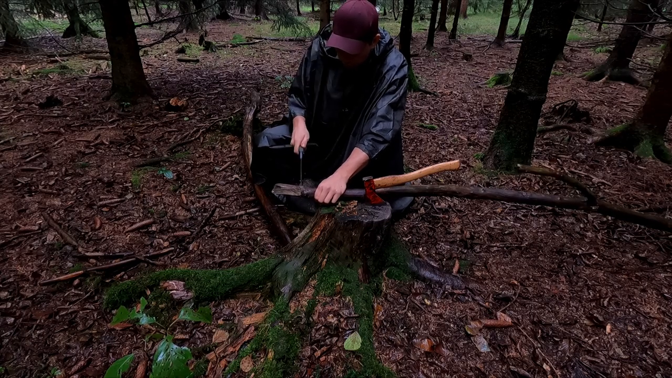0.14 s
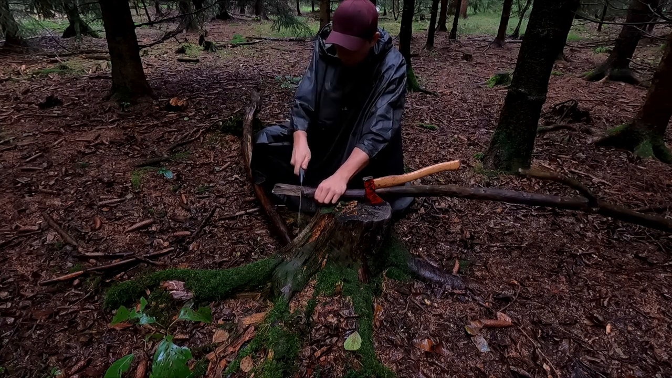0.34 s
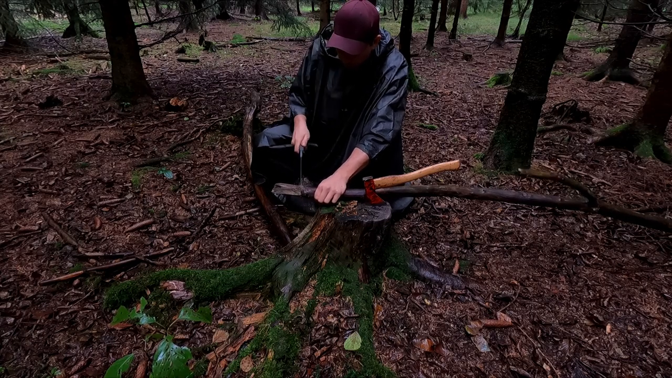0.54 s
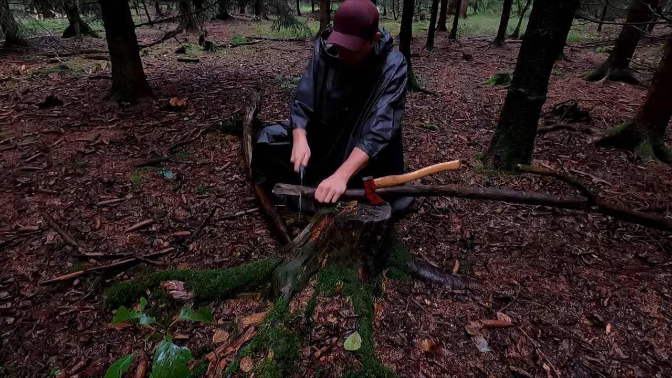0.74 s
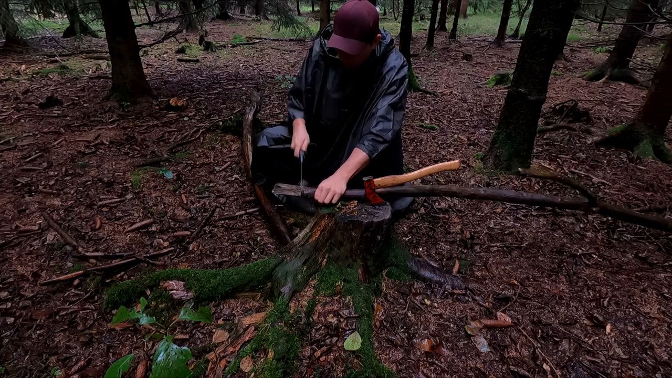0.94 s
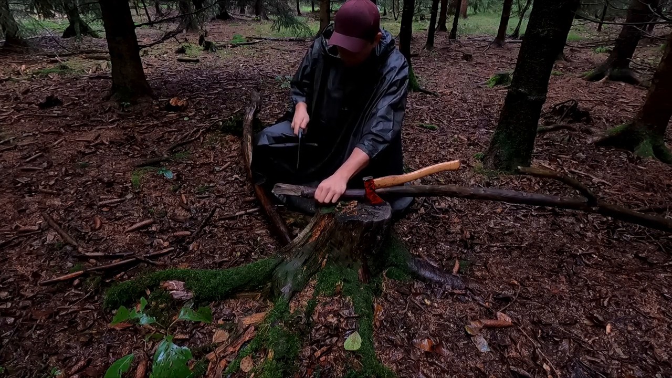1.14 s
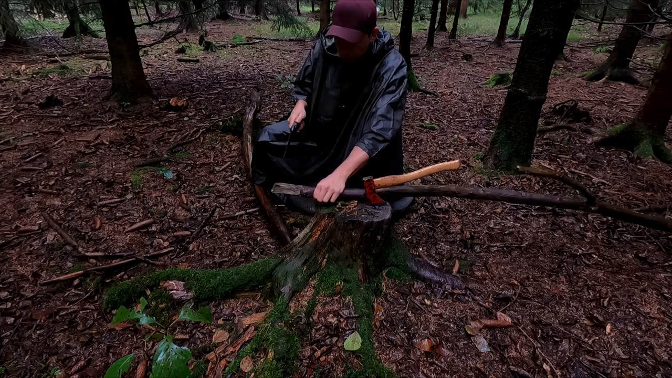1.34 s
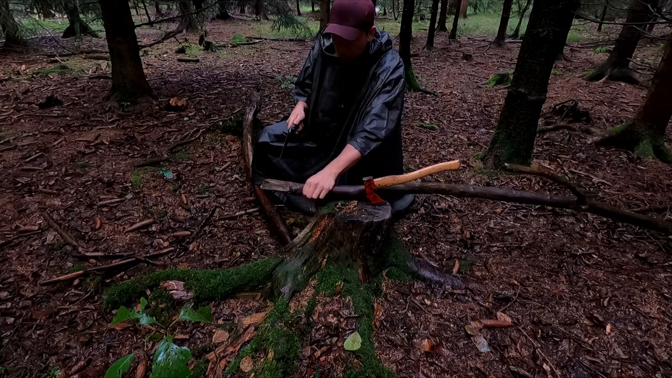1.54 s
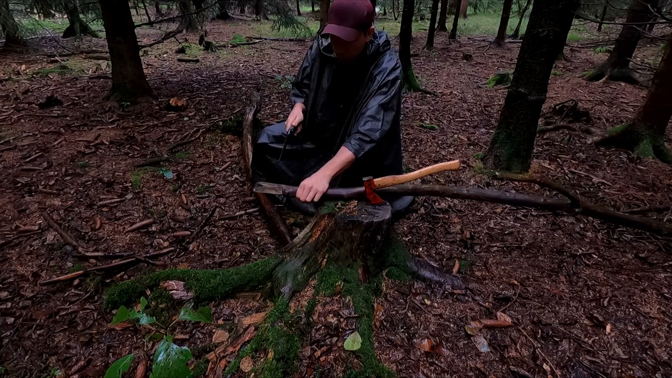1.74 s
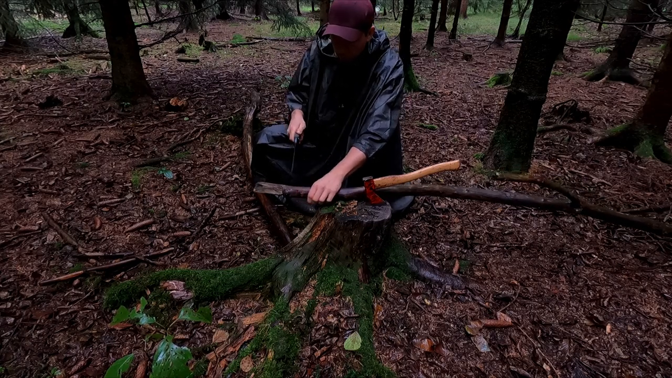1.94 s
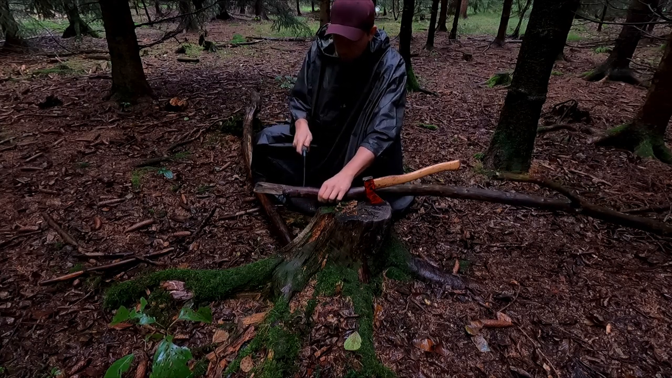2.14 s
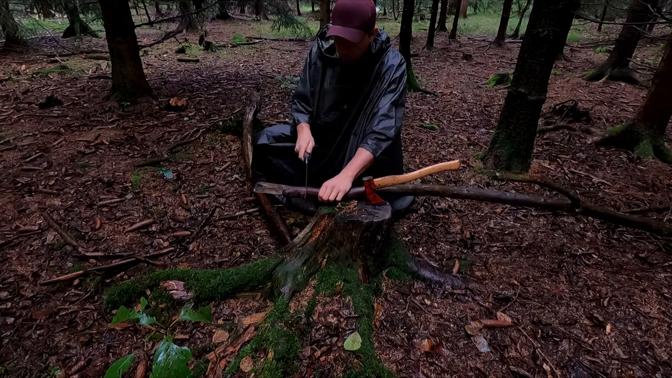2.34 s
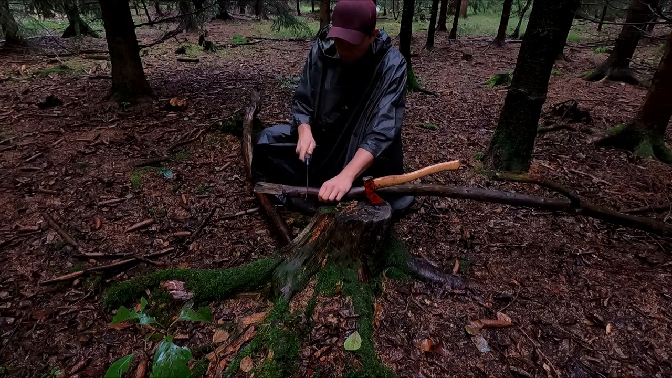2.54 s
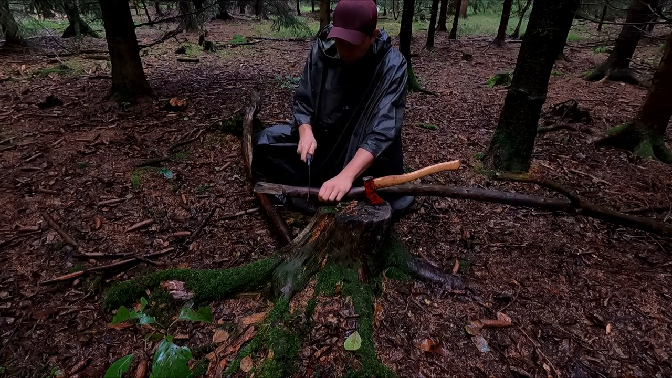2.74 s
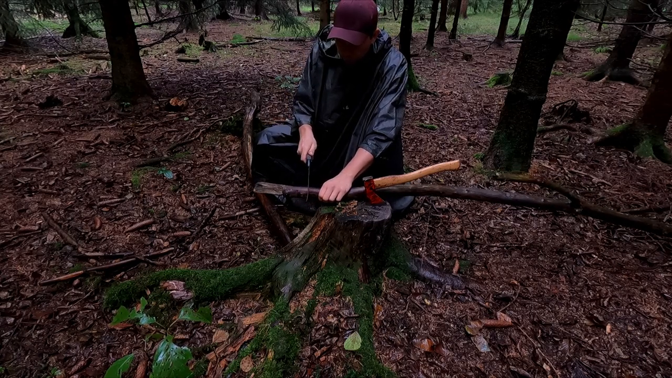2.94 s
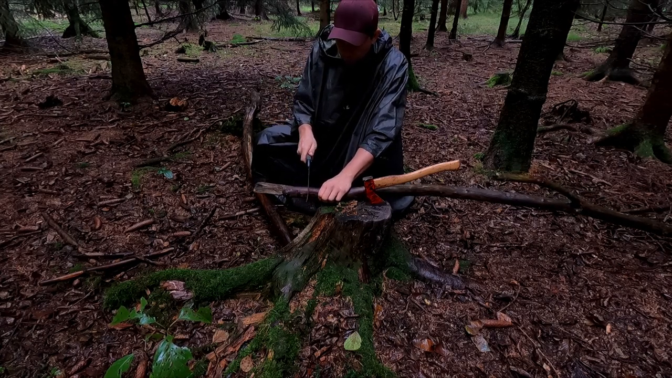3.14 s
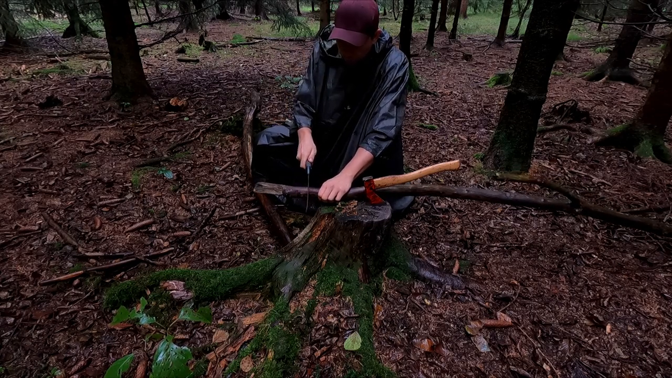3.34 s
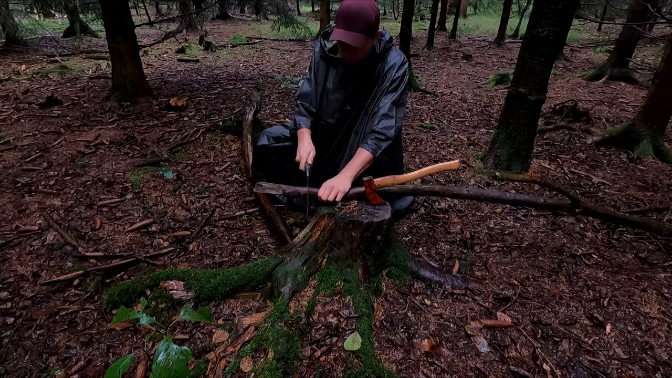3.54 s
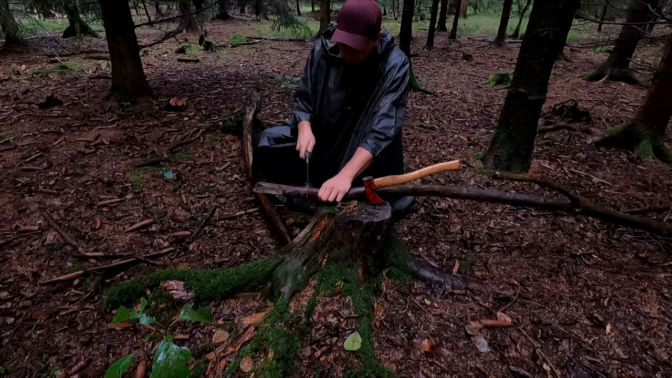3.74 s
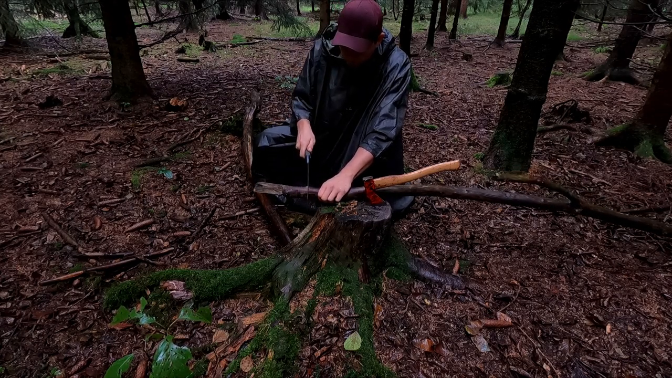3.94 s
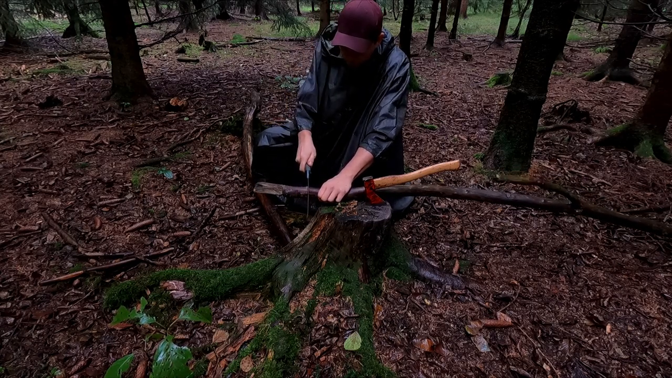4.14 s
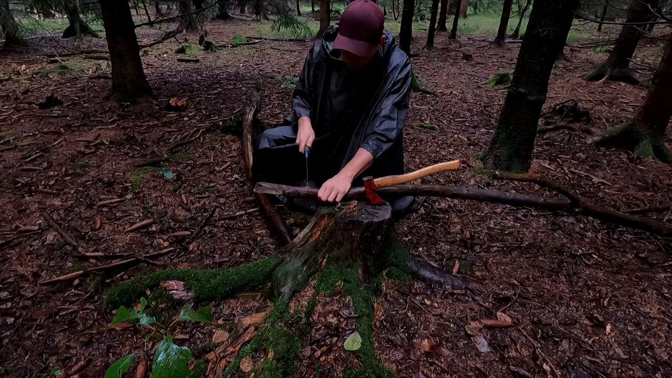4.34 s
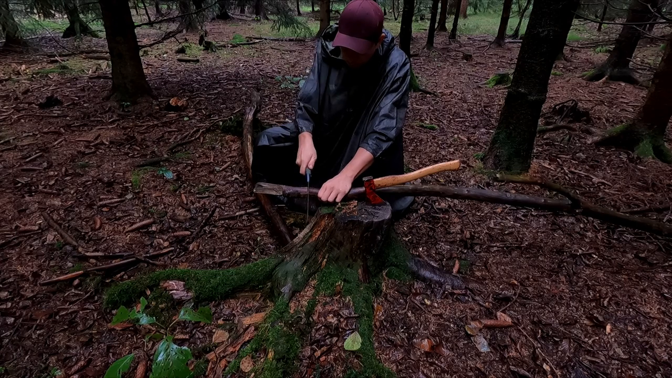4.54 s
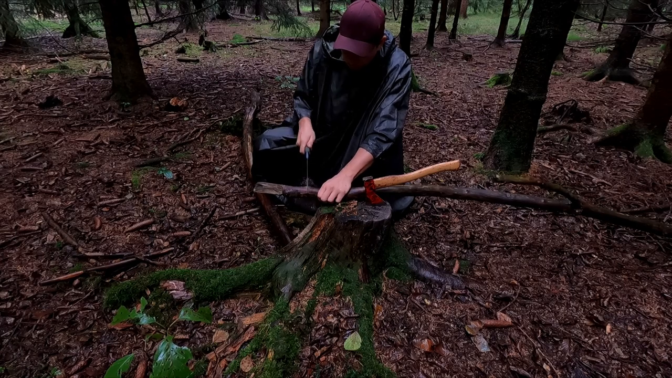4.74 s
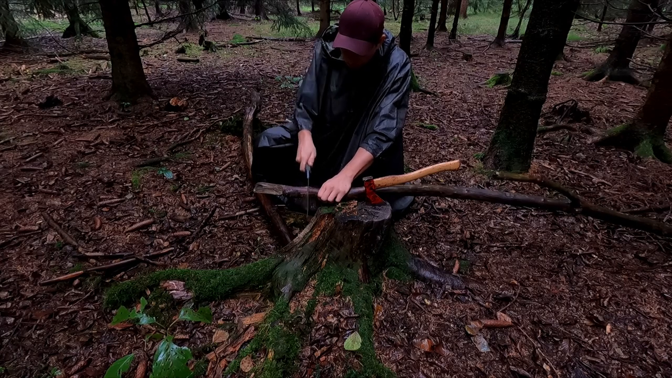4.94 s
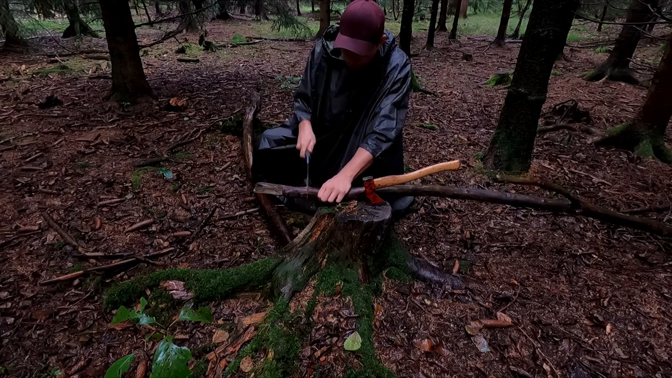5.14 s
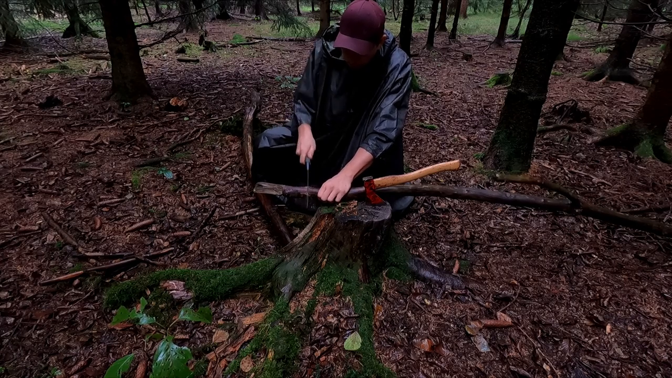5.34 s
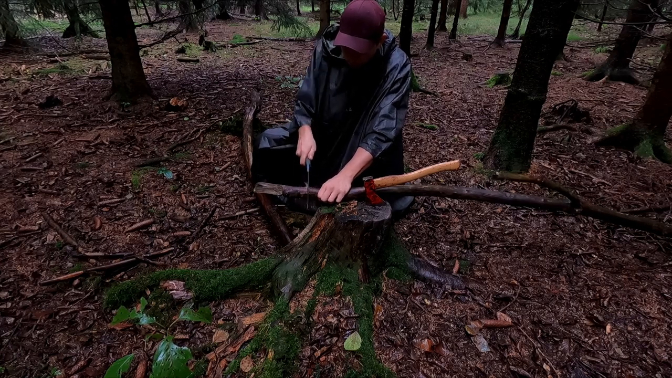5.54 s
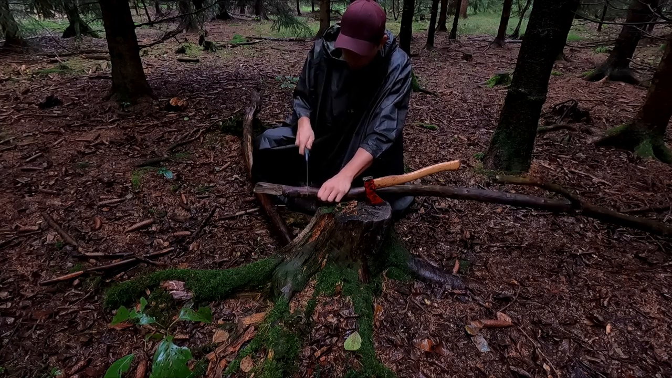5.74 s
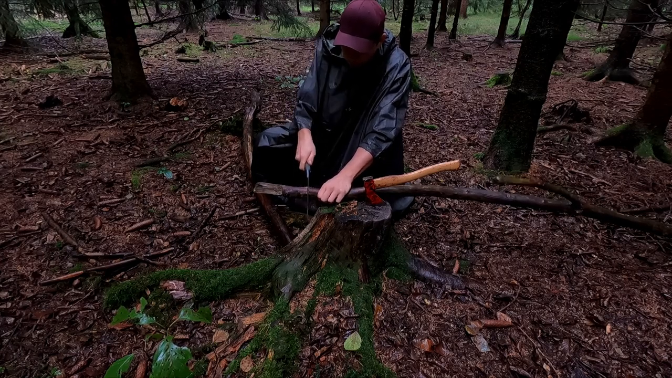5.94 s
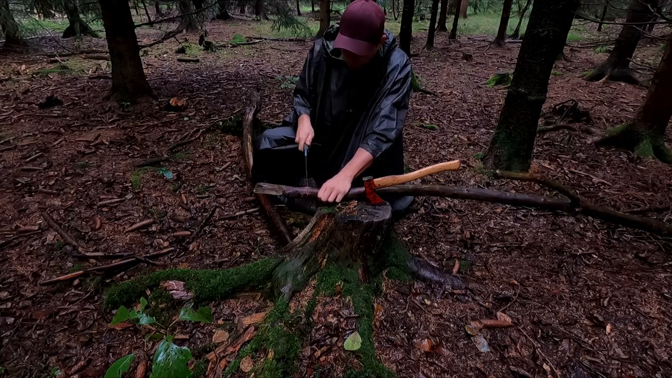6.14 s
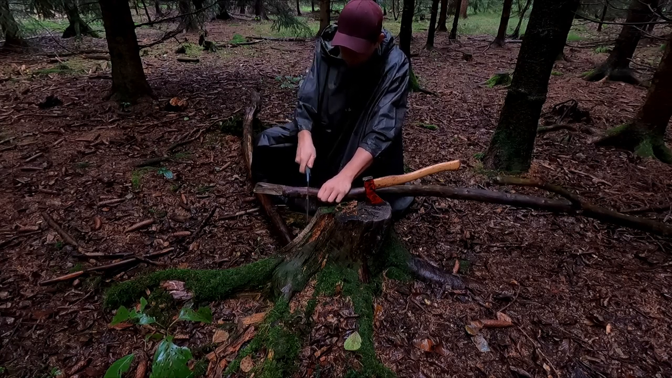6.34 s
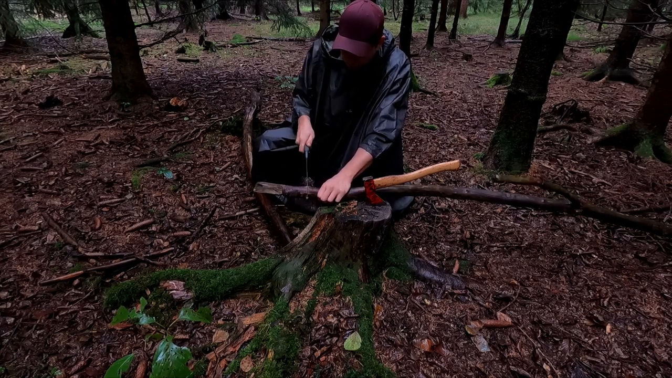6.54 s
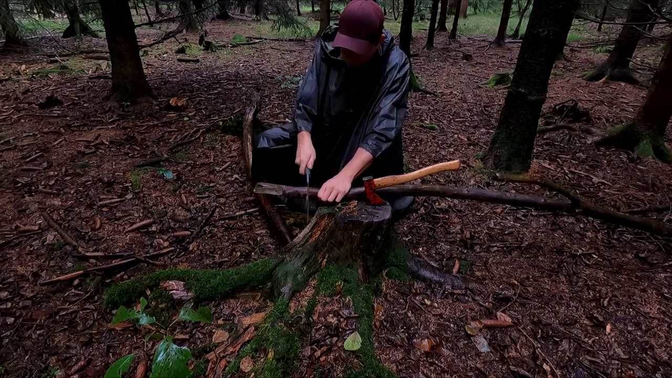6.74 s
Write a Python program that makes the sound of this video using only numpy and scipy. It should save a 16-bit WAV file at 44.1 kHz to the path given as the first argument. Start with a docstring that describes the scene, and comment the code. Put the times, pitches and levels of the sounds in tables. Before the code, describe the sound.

Two bouts of brisk, gritty hand sawing on wood, split by a quiet gap with drips, light rain, cloth crinkle and one dry snap.

```python
"""Hand saw in a wet forest

A small hand saw cuts a branch held on a stump, in two bouts of quick strokes. Teeth tear fibres at a rate that
follows the hand: random grains ring through filters for branch and blade, coloured differently at each cut.
Fading low tones make thumps and swells of the branch, short high ones a snap. Cloth crinkles in the pause,
drips tick, and filtered noise makes light rain and a low murmur of air."""
import sys
import numpy as np
from scipy import signal
from scipy.fft import rfft, irfft, next_fast_len
from scipy.io import wavfile
from scipy.ndimage import uniform_filter1d, map_coordinates

SR = 44100
rng = np.random.default_rng(int(sys.argv[2]) if len(sys.argv) > 2 else 0)


def dump_mix(stems):
    """Bounce the given channels to the path in sys.argv[1] as a 16-bit WAV at rate SR."""
    frames = np.atleast_2d(stems).T  # one column per channel
    limited = np.clip(frames, -1, 1)  # hard clip at full scale
    pcm = np.round(limited * 32767).astype(np.int16)
    wavfile.write(sys.argv[1], SR, pcm)


N = 304290
TIME = np.arange(N) / SR  # seconds

# Levels in the tables are relative; the functions shape them further.
# strokes of the blade, return and cut in turn: (start [s], end [s], hardest press [share of the stroke],
# rasp of the wood [dB], hiss of the steel [dB], depth of the bite [dB], shake of the branch [dB],
# tooth rate at full speed [Hz], tooth hum [dB])
STROKES = [(-.25, .044, 0.77, -22, -32.5, 9, -22, 226, -36),
           (.044, .263, 0.48, -19, -35.5, 2, -35.5, 305, -23.5),
           (.263, .488, 0.74, -24.5, -38.5, -1.5, -33.5, 262, -32),
           (.492, .722, .42, -18.5, -33, 2.5, -43, 325, -31),
           (.722, .942, .67, -25, -38, 2.5, -40, 262, -34.5),
           (.942, 1.199, 0.36, -18.5, -33, 1.5, -35.5, 312, -21.5),
           (3.28, 3.63, 0.48, -33.5, -45.5, -2, -27, 80.04, -29.5),
           (3.688, 4.01, 0.51, -25, -38, 5.5, -27.5, 251, -31.5),
           (4.005, 4.246, 0.66, -23.5, -37.5, 0.5, -36, 122.2, -27),
           (4.246, 4.482, 0.57, -19, -33.5, 2, -29, 233.5, -28),
           (4.482, 4.702, 0.61, -21, -33, -1, -31, 235, -32),
           (4.702, 4.925, .53, -17.5, -32, 3.5, -28, 285, -25),
           (4.925, 5.15, 0.65, -22, -32.5, 0.5, -34, 233.4, -31.5),
           (5.15, 5.373, 0.58, -17.5, -30.5, 4, -31, 297, -26),
           (5.373, 5.597, 0.62, -21, -32.5, -1, -34, 238.6, -33),
           (5.597, 5.829, 0.43, -18, -32, 3.5, -33.5, 296.5, -24),
           (5.829, 6.039, 0.62, -20.5, -32.5, 2.5, -34, 240.6, -32),
           (6.039, 6.262, 0.51, -19, -32, 2.5, -37.5, 320, -28.5),
           (6.262, 6.493, 0.61, -22, -33.5, -1.5, -33, 232.7, -34),
           (6.493, 6.714, 0.55, -19, -33, 2, -37, 290, -31.5),
           (6.714, 6.921, 0.62, -21.5, -33, -2, -30.5, 239, -30.5)]
# after each turn the teeth skate for a moment, then grip: (time since the turn [s], level [dB])
GRIP = [(0.02, -1), (0.028, 0)]
# the branch shakes most when about 130 teeth pass a second, least when they crawl:
# (tooth rate [Hz], shake [dB])
SHAKE_BY_RATE = [(10, -14.5), (66, -3.5), (130, -1), (240, -6), (320, -3)]
# broad colour of each cut: (frequency [Hz], level [dB])
FIRST_COLOUR = [(60, -27.5), (170, -10), (350, -8), (700, -6.5), (1500, -22.5), (2200, -10.5),
                (3200, -15.5), (4800, -16.5), (6500, -19.5), (9000, -21.5), (10500, -24), (12500, -37),
                (15000, -45)]
SECOND_COLOUR = [(60, -45), (170, -17.5), (350, -16), (700, -13.5), (1500, -18.5), (2200, -19), (3200, -21),
                 (4800, -25.5), (6500, -26), (9000, -24), (10500, -31.5), (12500, -39.5), (15000, -53)]
# resonances of branch and blade at each cut: (frequency [Hz], width [Hz], lift [dB])
FIRST_RESONANCES = [(826, 26, 8), (935, 39, 11.5), (1050, 71, 7), (1154, 103, 12), (1382, 153, 17.5),
                    (1505, 45, 16), (1689, 113, 15), (1840, 250, 10), (2513, 93, 10), (2895, 220, 8),
                    (3350, 77, 9.5), (7200, 610, 3)]
SECOND_RESONANCES = [(408.4, 19, 7.2), (532, 39, 14.4), (687, 76, 10.6), (742, 38, 8.7),
                     (914.3, 26.6, 11.7), (1050, 88, 11.5), (1297, 32, 9.7), (1455, 91, 5.6),
                     (1652, 33, 10.7), (1881, 280, 9.7), (2420, 13, 15.5), (2666, 110, 8.4),
                     (2890, 120, 7.7), (3272, 107, 9.7), (3790, 750, 5.2), (7610, 110, 4.5)]
# slow sway of the branch on the stump, and its second bending mode: (frequency [Hz], level [dB])
SWAY_COLOUR = [(20, -36), (45, -13.5), (66, 1.5), (88, -3.5), (115, -9), (160, -18), (300, -37),
               (800, -120)]
FLEX_COLOUR = [(70, -38), (110, -1), (145, -2), (172, 8), (205, -10.5), (250, -7), (330, -9), (900, -120)]
# how well the branch radiates the tooth rate: (frequency [Hz], level [dB])
HUM_COLOUR = [(35, -27), (65, 0.5), (120, 0), (170, 0), (220, -11.5), (265, -2.5), (300, 1), (345, -1.5),
              (700, -32)]
# likeness of left and right for saw and sleeve: (frequency [Hz], likeness [0-1])
WORK_ALIKE = [(170, 1), (860, 0.98), (1900, 0.94), (2900, 0.93), (4100, 0.78), (6200, 0.84), (8300, 1),
              (11000, 0.88), (14000, 0.31)]
# place of the work between the ears: (frequency [Hz], left over right [dB])
WORK_BALANCE = [(60, 1.5), (100, -2), (180, 0), (310, -1), (550, -2.5), (950, -3.5), (1650, -2.5),
                (2860, -1.0), (4970, -1), (8640, 1), (15000, 3)]
# how far the left side runs ahead: (frequency [Hz], lead [rad])
WORK_LEAD = [(170, -0.02), (500, -0.074), (860, -0.092), (1400, -0.13), (1900, -0.34), (2400, -0.6),
             (2900, -0.56), (3400, -0.61), (4100, -0.26), (5000, -0.31), (6200, -0.49), (8300, -0.5),
             (11000, -0.47), (14000, -0.01)]
# low thumps of the branch, and low tones swelling where the tooth rate meets a mode of the branch:
# (time [s], level [dB], pitch [Hz], time to fade by 60 dB [s])
BRANCH_TONES = [(0.532, -13.5, 195, 0.073), (0.545, -13, 221, 0.065), (1.857, -16, 88.6, 0.14),
                (1.905, -30.5, 65.1, 0.45), (1.962, -31, 64.5, 0.33), (2.015, -15, 184, 0.016),
                (3.858, -15.5, 70, 0.4), (4.166, -20.5, 113.5, 0.32), (4.553, -18, 165, 0.099),
                (4.636, -15.5, 122, 0.13), (4.754, -14.5, 171, 0.13), (5.084, -18, 122, 0.18),
                (5.646, -19.5, 164, 0.13), (5.991, -20.5, 114.7, 0.13)]
# one sharp snap close by: (time [s], level [dB])
SNAP = [(3.178, -11)]
# the tones within the snap: (frequency [Hz], level [dB], time to fade by 60 dB [s])
SNAP_TONES = [(1150, -45, 0.0045), (3050, -16, 0.02), (3210, -4, 0.017), (3500, -9, 0.012),
              (6300, -0.5, .004), (7400, 0.5, 0.0033), (9720, -3, 0.0037)]
# the sleeve rustles as the hand shifts the branch: (time [s], level [dB])
SLEEVE = [(1.5, -85), (1.6, -53), (1.69, -45), (1.76, -49.5), (1.8, -54), (1.87, -45.5), (1.95, -81),
          (2.05, -90)]
# colour of the rustling cloth: (frequency [Hz], level [dB])
SLEEVE_COLOUR = [(200, -11), (600, -15), (1500, -2), (2500, -15), (5000, -8.5), (10000, -23), (15000, -36)]
# the loudest ticks, from drops on cloth and litter and catches of the blade:
# (time [s], level [dB], pitch [Hz], ring [cycles])
TICKS = [(0.4485, -9, 1750, 1.2), (0.698, -17.5, 2620, 1.1), (1.1711, -14.5, 1560, 1.3),
         (1.4364, -28, 6420, 2.8), (1.712, -26, 5120, 3.1), (1.8494, -21, 1550, 0.5),
         (1.9538, -27, 5130, 1), (2.4602, -29, 5250, 1.6), (1.7514, -23.5, 1900, 0.85),
         (1.798, -26, 2140, 2.5), (2.014, -26.5, 2600, 2.75), (2.1963, -26, 5400, 3),
         (2.3248, -24.5, 6440, 2.3), (2.7375, -19, 1960, 1.5), (2.821, -25.5, 4000, 1.6),
         (2.8298, -28, 6700, 1.7), (2.9589, -27.5, 1770, 2.4), (3.0873, -19, 3400, 2.2),
         (3.1649, -18.5, 5200, 2.3), (3.5864, -24, 1300, 3.3), (3.6601, -23.5, 1340, 3.4),
         (3.3302, -27, 5650, 2), (3.4835, -16, 2800, 4), (3.8674, -8.5, 1630, 0.5),
         (4.2126, -16, 1500, 2.2)]
# rain on the forest: (time [s], level [dB])
RAIN = [(1.25, -50), (1.48, -50), (1.68, -48.5), (3.05, -49), (3.25, -48.5)]
# colour of the rain: (frequency [Hz], level [dB])
RAIN_COLOUR = [(240, -23), (400, -4.5), (623, -3), (784, -5), (986, 2.5), (1170, 3.5), (2020, 0.5),
               (2880, 0), (3350, -1.5), (3620, -3), (5550, -4.5), (7420, -8.5), (12500, -20), (15500, -39)]
# likeness of left and right for rain and air: (frequency [Hz], likeness [0-1])
RAIN_ALIKE = [(60, 0.59), (150, 0.76), (380, 0.23), (950, 0.8), (2380, 0.43), (5980, 0.69), (15000, 0.22)]
# low murmur of the open air: (frequency [Hz], level [dB])
AIR_COLOUR = [(12, -43), (20, -11), (59, -7), (118, -18), (135, -3.5), (160, 0.5), (201, -4), (231, -6),
              (259, -12.5), (409, -14), (600, -28), (780, -57), (1320, -120)]
# answer of the trunks: (frequency [Hz], time to fade by 60 dB [s])
FOREST = [(200, 0.59), (1500, 0.12), (10000, 0.05)]

TURN_PRESS = 0.025  # share of the press that stays while the hand turns
UNEVEN_DB = 0.27  # the press falters in knotty wood
SHAKE_LAG_S = 0.031
# rasp and hum grow as powers of the press; the hiss of the steel follows press and speed
RASP_POWER, HUM_POWER, HISS_POWER, HISS_SPEED_POWER = 1.85, 2.15, 1, 0.6
# fainter drips fall at random
DRIPS_PER_S, DRIP_DB, DRIP_SCATTER_DB = 8, -33.5, 2.5
DRIP_HZ, DRIP_SCATTER_OCTAVES, DRIP_CYCLES = 5460, 0.15, 2.3
AIR_DB = -52.5
TOP_HZ = 15600


def amp(db):
    """Turn decibels into a plain factor."""
    return 10 ** (np.asarray(db) / 20)


def unit(x):
    """Scale a sound to an average strength (rms) of 1."""
    return x / np.sqrt(np.mean(x ** 2) + 1e-20)


def along(points, hz):
    """Read a table of (frequency [Hz], value) on a log axis."""
    f, v = np.transpose(points)
    return np.interp(np.log(hz + 1), np.log(f + 1), v)


def curves(rows):
    """One value per sample for each column after the time."""
    s, *cols = np.transpose(rows)
    return [np.interp(TIME, s, c) for c in cols]


def wobble(rate):
    """A smooth random curve with this many random points a second."""
    return map_coordinates(rng.standard_normal(int(N * rate / SR) + 4), [TIME * rate])


def delayed(pair, delay_s):
    """Both sides, shifted in time by an amount that may change."""
    return np.array([np.interp(TIME - delay_s, TIME, side) for side in pair])


def filtered(x, response):
    """Shape a sound's spectrum by a response that depends on frequency."""
    size = 2 * next_fast_len((N + SR) // 2)
    return irfft(rfft(x, size) * response(np.fft.rfftfreq(size, 1 / SR)), size)[..., :N]


def causal(db):
    """The response with these gains that rings only after its cause."""
    cepstrum = irfft(np.log(amp(db)))
    half = len(cepstrum) // 2
    return np.exp(rfft(np.r_[cepstrum[0], 2 * cepstrum[1:half], np.zeros(half)]))


def band(hz, low_hz, high_hz, order=8):
    """Gain in dB of a pass band, steeper with a higher order."""
    return -10 * np.log10((1 + (hz / high_hz) ** order) * (1 + (low_hz / (hz + 1)) ** order))


def add(track, s, sound):
    """Mix a sound in at time s."""
    part = track[..., round(s * SR):][..., :sound.shape[-1]]
    part += sound[..., :part.shape[-1]]


def spread(pair, alike):
    """Two unrelated signals become left and right with the given likeness."""
    turn = lambda hz: np.arccos(np.clip(along(alike, hz), -1, 1)) / 2
    mid, side = filtered(pair, lambda hz: np.array([np.cos(turn(hz)), np.sin(turn(hz))]))
    return np.array([mid + side, mid - side])


def grains(rate, scatter_db):
    """Two trains of random impulses, about this many a second, with an rms of 1."""
    hit = rng.random((2, N)) < rate / SR
    size = amp(scatter_db * rng.standard_normal((2, N)))
    return unit(hit * rng.standard_normal((2, N)) * size)


def saw(bite=0.12, steel_bite=0.14, hiss_lift_db=2.0, flex_db=-25.5, flex_growth=0.44,
        overtone_db=-9, near_s=0.001045, far_s=0.00197, reflection=0.028):
    """Each tooth tears a burst of fibres and nudges the branch, which shakes on the stump."""
    first = TIME < 2  # seconds; the second cut follows
    teeth, rasp, hiss, shake, hum, depth_db, travel = hand()
    hiss = hiss * amp(hiss_lift_db)
    phase = 2 * np.pi * teeth
    clumps = amp(0.92 * wobble(70))
    tearing = grains(rate=9000, scatter_db=1.5) * (1 + bite * np.cos(phase)) * clumps
    sliding = grains(rate=26000, scatter_db=3.0) * (1 + steel_bite * np.cos(phase)) * clumps
    sliding = sliding * amp(1.26 * wobble(50))

    # waves return from the blade's tip, later as more of it sticks out: the colour sweeps within a stroke
    delay_s = near_s + (far_s - near_s) * travel
    tearing = patchy(tearing + reflection * delayed(tearing, delay_s), depth_db=2.0)
    sliding = patchy(sliding + reflection * delayed(sliding, delay_s), depth_db=2.0)

    depth_db = depth_db + 0.96 * wobble(25)  # the wood is uneven
    sound = cut(tearing, sliding, FIRST_COLOUR, FIRST_RESONANCES, rasp * first, hiss * first, depth_db)
    sound = sound + cut(tearing, sliding, SECOND_COLOUR, SECOND_RESONANCES,
                        rasp * ~first, hiss * ~first, depth_db)

    # the whole branch moves too, even while the blade is slow
    rumble = lambda colour: unit(filtered(rng.standard_normal(N), lambda hz: amp(along(colour, hz))))
    sway = shake * rumble(SWAY_COLOUR)
    flex = rasp ** flex_growth * amp(flex_db) * rumble(FLEX_COLOUR)

    # evenly spaced teeth hum, loudest where their rate meets a mode of the branch
    tone = np.sin(phase) + amp(overtone_db) * np.sin(2 * phase)
    tone = unit(tone * amp(1.3 * wobble(45)))
    tone = filtered(hum * tone, lambda hz: amp(along(HUM_COLOUR, hz)))
    return spread(sound, WORK_ALIKE) + sway + flex + tone


def hand(arc=0.91, unsteady=0.022):
    """The hand sets, per sample: teeth passed, four levels, bite depth, and how far the blade is out (0-1)."""
    rate, rasp, hiss, shake, hum, depth_db, travel = np.zeros((7, N))
    for k, stroke in enumerate(STROKES):
        start, end, hardest, rasp_db, hiss_db, bite_db, shake_db, top_hz, hum_db = stroke
        inside = (TIME >= start) & (TIME < end)
        done = (TIME[inside] - start) / (end - start)
        speed = np.abs(np.sin(np.pi * done)) ** arc  # the hand speeds up, then slows to turn
        swell = np.sin(np.interp(done, [0, np.clip(hardest, 0.05, 0.95), 1], [0, np.pi / 2, np.pi]))
        press = np.abs(TURN_PRESS + (1 - TURN_PRESS) * swell)
        rate[inside] = top_hz * speed
        grip_db = np.interp(TIME[inside] - start, *np.transpose(GRIP))
        rasp[inside] = amp(rasp_db + grip_db) * press ** RASP_POWER
        hiss[inside] = amp(hiss_db + grip_db) * press ** HISS_POWER * speed ** HISS_SPEED_POWER
        shake[inside] = amp(shake_db + along(SHAKE_BY_RATE, rate[inside]))
        hum[inside] = amp(hum_db) * press ** HUM_POWER
        depth_db[inside] = bite_db
        travel[inside] = (1 + (-1) ** k * np.cos(np.pi * done)) / 2  # strokes alternate in direction
    # the branch takes a moment to start and stop shaking
    keep = np.exp(-1 / (SHAKE_LAG_S * SR))
    shake = signal.lfilter([1 - keep], [1, -keep], shake)
    falter = amp(UNEVEN_DB * wobble(35))
    teeth = np.cumsum(rate * (1 + unsteady * wobble(60))) / SR
    return teeth, rasp * falter, hiss * falter, shake, hum, depth_db, travel


def cut(tearing, sliding, colour, resonances, rasp, hiss, depth_db, wood_hz=1150, steel_hz=4300):
    """Tearing rings wood and, higher up, blade; a deeper bite favours the wood; the sliding steel hisses."""
    def body(hz):
        """Gain in dB: the broad colour with a peak for each resonance."""
        peaks = sum(db / (1 + (2 * (hz - centre) / width) ** 2) for centre, width, db in resonances)
        return along(colour, hz) + peaks

    ring = unit(filtered(tearing, lambda hz: causal(body(hz) + band(hz, 22, steel_hz))))
    # the changing grip bends all resonances by a percent or so
    ring = unit(delayed(ring, 0.0009 * wobble(11)))
    wood = filtered(ring, lambda hz: amp(band(hz, 20, wood_hz)))
    blade = ring - wood
    steel = unit(filtered(sliding, lambda hz: causal(body(hz) + band(hz, steel_hz, SR))))
    return rasp * (wood * amp(depth_db / 2) + blade * amp(-depth_db / 2)) + hiss * steel


def patchy(pair, depth_db):
    """Knots and the shifting grip favour changing patches of the spectrum, some 400 Hz wide and 80 ms long."""
    z = signal.stft(pair, nperseg=512)[2]
    field = uniform_filter1d(rng.standard_normal(z.shape[1:]), size=5, axis=0)
    field = uniform_filter1d(field, size=14, axis=1)
    return signal.istft(z * amp(depth_db * unit(field)), nperseg=512)[1][:, :N]


def branch_tones(attack_s=0.00067):
    """Thumps of the branch, and swells where the tooth rate meets one of its modes, as fading low tones."""
    out, t = np.zeros(N), np.arange(SR // 3) / SR
    for s, db, pitch_hz, t60 in BRANCH_TONES:
        fade = amp(db - 60 * t / t60) * (1 - np.exp(-t / attack_s))
        add(out, s, fade * np.sin(2 * np.pi * pitch_hz * t))
    return out


def snap(echo_s=0.00273, echo_db=-18, low_hz=900, high_hz=11500):
    """A hard, almost ringless snap of fast-fading tones, and its bounce off the ground."""
    out, t = np.zeros(N), np.arange(SR // 16) / SR
    ring = sum(amp(db - 60 * t / t60) * np.sin(2 * np.pi * hz * t) for hz, db, t60 in SNAP_TONES)
    for s, db in SNAP:
        add(out, s, amp(db) * ring)
        add(out, s + echo_s, amp(db + echo_db) * ring)
    return filtered(out, lambda hz: causal(band(hz, low_hz, SR, order=3) + band(hz, 1, high_hz, order=12)))


def sleeve():
    """Stiff rainproof cloth crinkles in fine grains."""
    level_db, = curves(SLEEVE)
    crinkle = filtered(grains(rate=1600, scatter_db=7.5), lambda hz: causal(along(SLEEVE_COLOUR, hz)))
    return amp(level_db) * unit(spread(crinkle, WORK_ALIKE))


def ticks(rise=0.32, tail_db=-15, tail_t60=0.024):
    """Each tick swells and dies within a few cycles of its pitch, and leaves a faint rustle."""
    out, t = np.zeros(N), np.arange(SR // 16) / SR
    for s, db, pitch_hz, cycles in list(TICKS) + drips():
        age = t * pitch_hz / (rise * cycles)  # the swell peaks at age 1
        tick = (age * np.exp(1 - age)) ** 2 * np.sin(2 * np.pi * pitch_hz * t)
        resonance = signal.iirpeak(min(pitch_hz, SR / 4), 2, SR)
        rustle = unit(signal.lfilter(*resonance, rng.standard_normal(len(t))))
        add(out, s, amp(db) * (tick + rustle * amp(tail_db - 60 * t / tail_t60)))
    return out


def drips():
    """Drips fall at random times as faint ticks, each with its own size and pitch."""
    seconds = N / SR
    chance = rng.standard_normal((round(DRIPS_PER_S * seconds), 2))
    rows = []
    for size, pitch in chance:
        level_db = DRIP_DB + DRIP_SCATTER_DB * size
        pitch_hz = DRIP_HZ * 2 ** (DRIP_SCATTER_OCTAVES * pitch)
        rows.append((rng.uniform(0, seconds), level_db, pitch_hz, DRIP_CYCLES))
    return rows


def rain(lift_db=2.0, near_db=-7.5):
    """Countless far drops merge into a hiss; nearer ones patter brightly, over a low murmur of air."""
    level_db, = curves(RAIN)
    near = np.diff(grains(rate=39, scatter_db=1.0), prepend=0)  # the difference brightens the drops
    drops = rng.standard_normal((2, N)) + amp(near_db) * near
    patter = unit(spread(filtered(drops, lambda hz: causal(along(RAIN_COLOUR, hz))), RAIN_ALIKE))
    air = filtered(rng.standard_normal((2, N)), lambda hz: amp(along(AIR_COLOUR, hz)))
    air = unit(spread(air, RAIN_ALIKE) * amp(0.46 * wobble(5.24)))
    return amp(level_db + lift_db + 0.37 * wobble(42)) * patter + amp(AIR_DB) * air


def forest(x):
    """Trunks scatter a thin tail, in which the treble dies first."""
    hz, t, z = signal.stft(rng.standard_normal((2, SR // 2)), SR, nperseg=256)
    tail = signal.istft(z * amp(-60 * t / along(FOREST, hz)[:, None]), SR, nperseg=256)[1]
    return signal.fftconvolve(x, tail / np.linalg.norm(tail[0]), axes=1)[:, :N]


def scene():
    """The work lies a little to the right; the rain is all around."""
    sides = np.array([[0.5], [-0.5]])  # left, right
    work = saw() + branch_tones() + snap() + sleeve() + ticks()
    balance = lambda hz: amp(sides * along(WORK_BALANCE, hz))
    lead = lambda hz: np.exp(1j * sides * along(WORK_LEAD, hz))
    near = filtered(work, lambda hz: balance(hz) * lead(hz))
    return near + amp(-29.0) * forest(near) + rain() * amp(sides * -0.8)


def record(dry):
    """Nothing passes above the band limit."""
    return filtered(dry, lambda hz: hz < TOP_HZ)


dry = scene()
out = record(dry)
dump_mix(out)
```